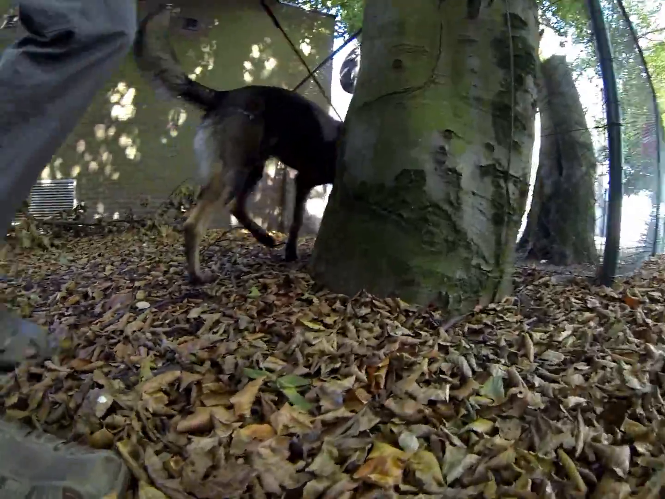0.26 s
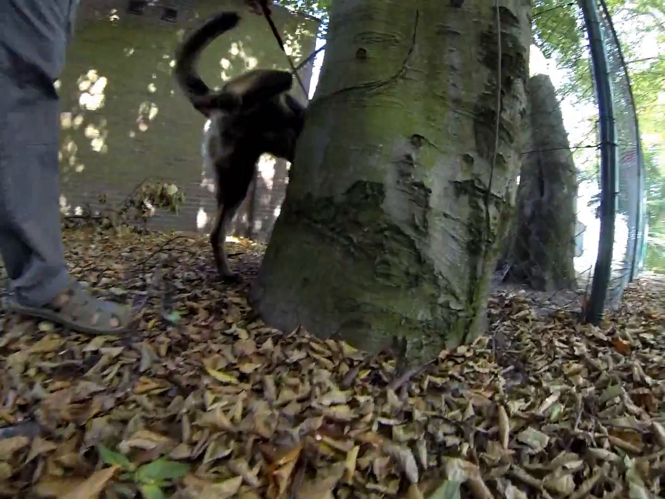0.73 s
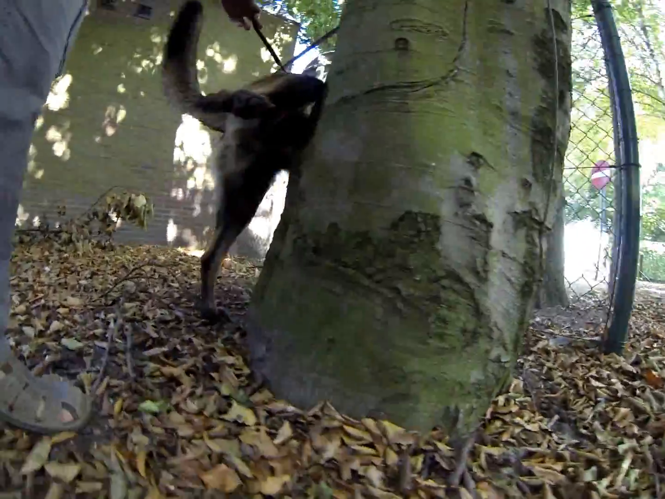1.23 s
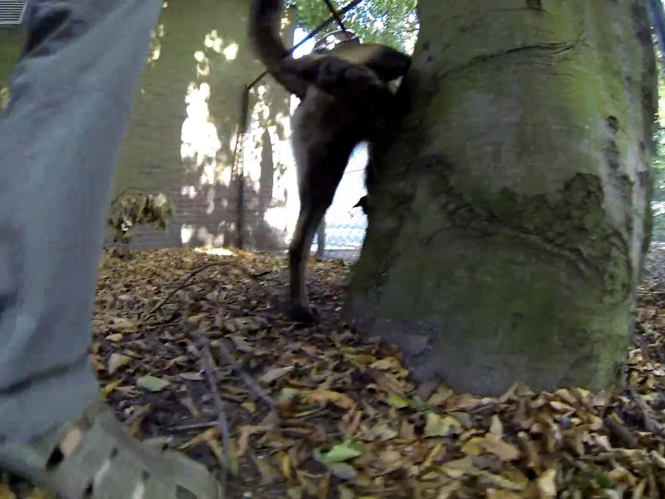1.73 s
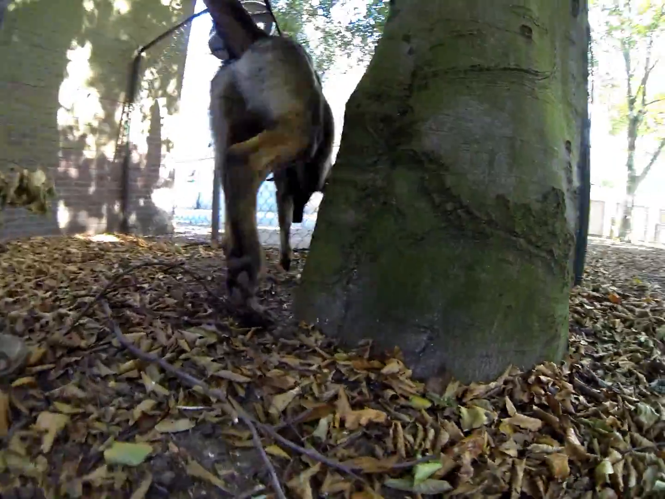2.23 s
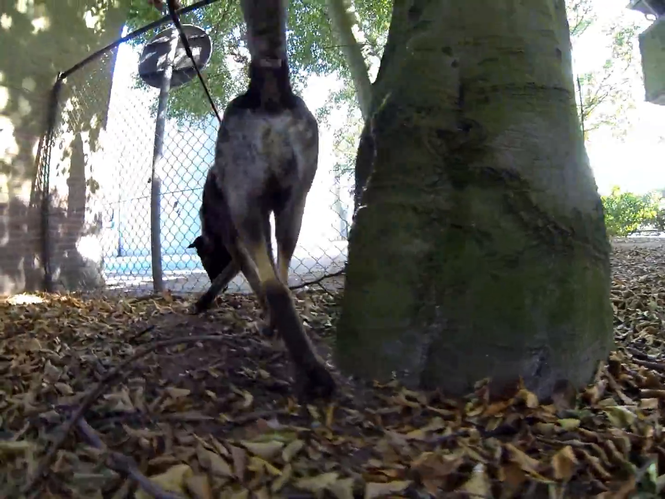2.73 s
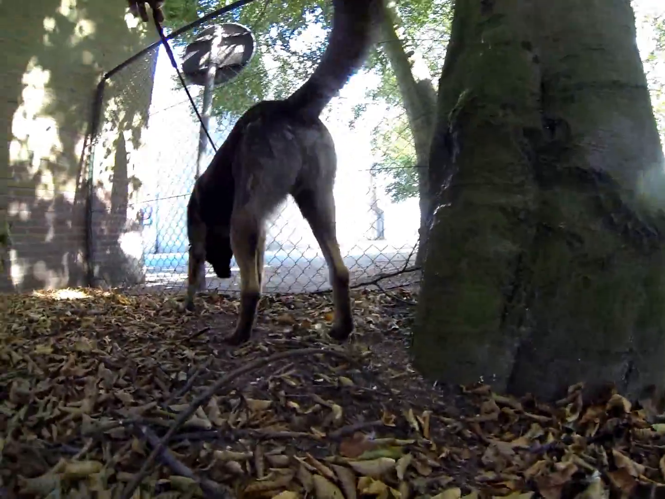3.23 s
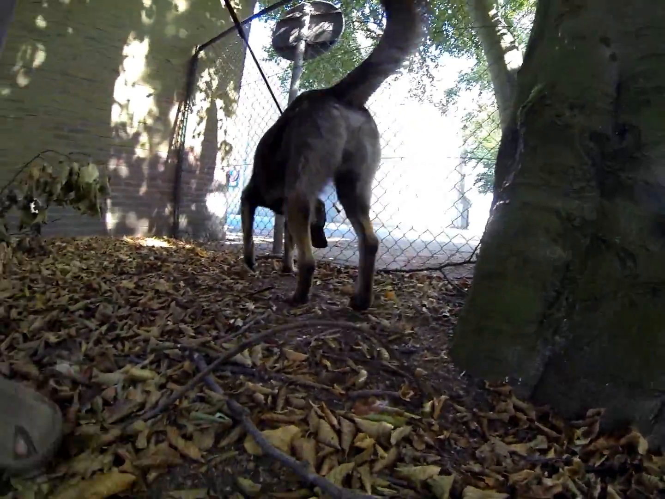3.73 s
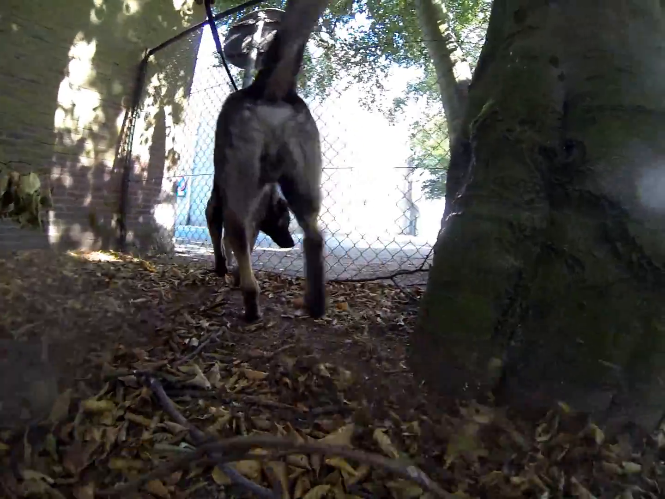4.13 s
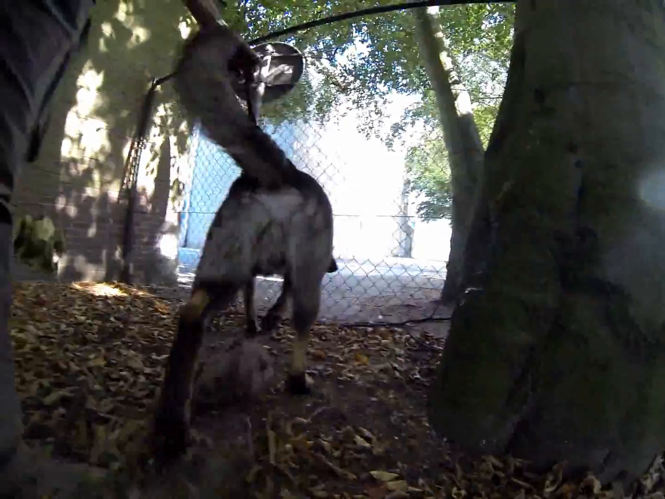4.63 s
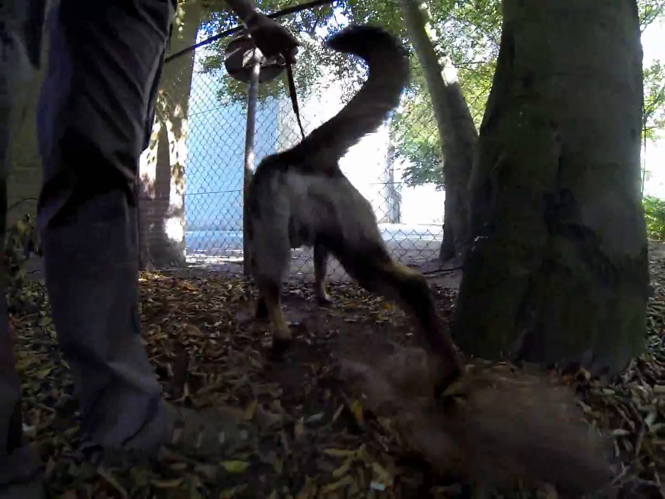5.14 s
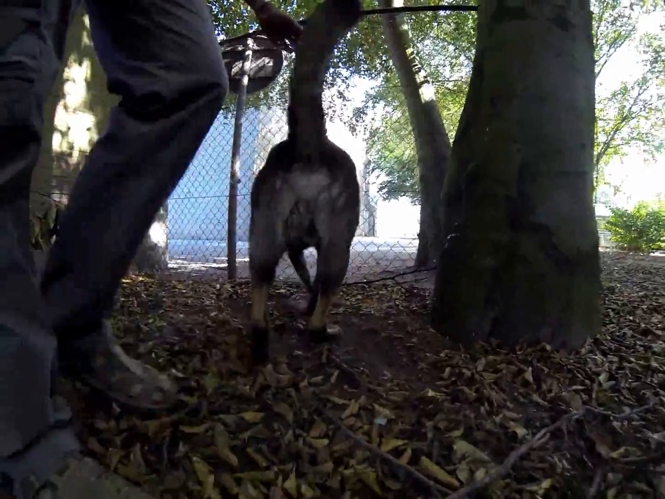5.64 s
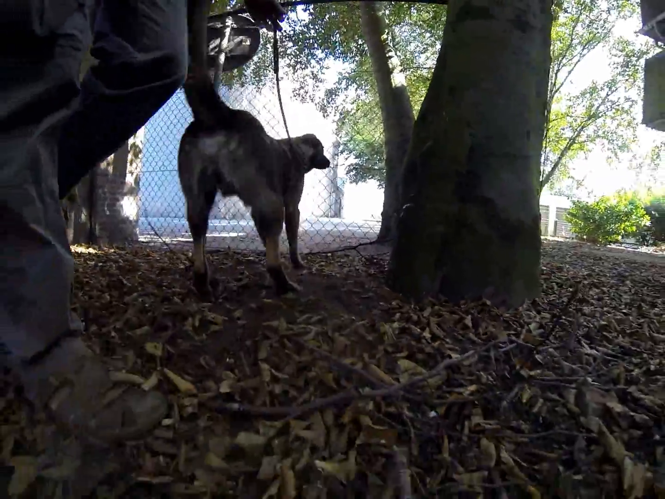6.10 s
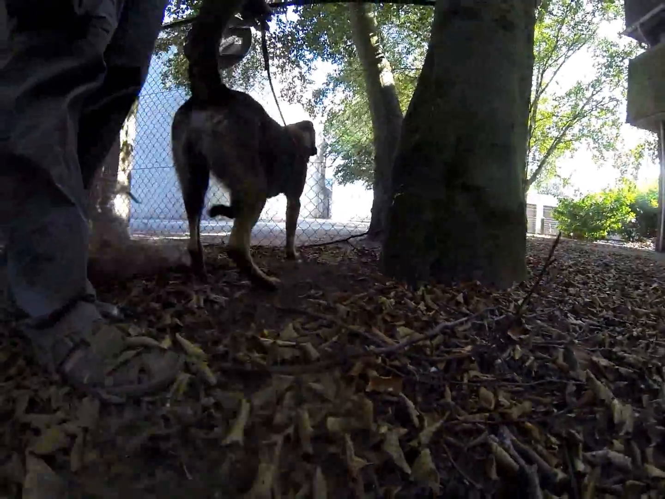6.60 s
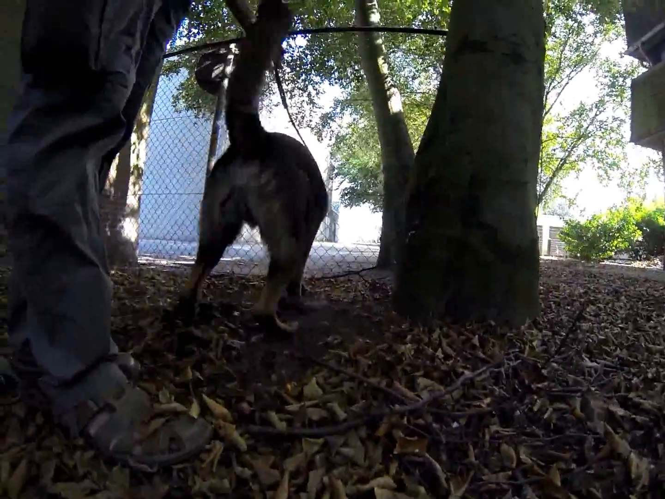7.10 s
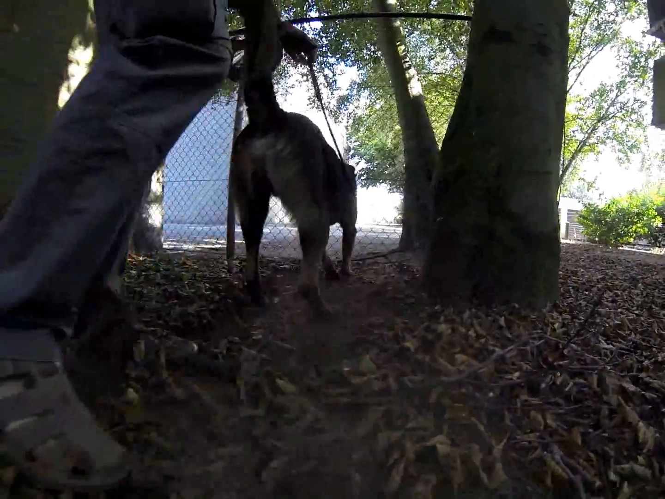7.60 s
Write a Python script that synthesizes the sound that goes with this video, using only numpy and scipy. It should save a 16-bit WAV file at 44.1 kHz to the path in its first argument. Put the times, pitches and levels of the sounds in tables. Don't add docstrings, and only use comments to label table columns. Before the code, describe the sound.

A dog shuffles and kicks through crisp fallen leaves, close and boxy, over handling rumble, ending with two bursts of sharp, loud knocks.

```python
import sys
import numpy as np
from scipy import signal
from scipy.fft import rfft, irfft
from scipy.io import wavfile
from scipy.ndimage import uniform_filter1d, map_coordinates

SR = 44100
rng = np.random.default_rng(int(sys.argv[2]) if len(sys.argv) > 2 else 0)


def natural_amplitude(level_db):
    exponent = np.asarray(level_db, float) / 20
    return 10 ** exponent


def store_wav(level_fs):
    pcm = np.round(np.clip(np.atleast_2d(level_fs), -1, 1) * 32767)
    wavfile.write(sys.argv[1], SR, pcm.T.astype(np.int16))


N = 346621

# time in seconds, gain in dB.
DUCK = [
    (0, 7),
    (6.41, 11),
    (6.5, -5),
    (6.85, -2.5),
    (7.15, 3.5),
    (7.39, 16),
    (7.46, 13),
    (7.86, 12),
]
SCRAPE_RISE, SCRAPE_FALL = 470, 188
CRUNCH_LIFE = 0.46
FIZZ_LIFE = 0.62


def unit(x):
    return x / np.sqrt(np.mean(x ** 2) + 1e-20)


def along(points, hz):
    f, v = np.transpose(points)
    return np.interp(np.log(hz + 1), np.log(f + 1), v)


def curves(rows):
    s, *cols = np.transpose(np.vstack(rows))
    return [np.interp(np.arange(N) / SR, s, c) for c in cols]


def wobble(rate):
    knots = rng.standard_normal(int(N * 400 / SR) + 4)
    return map_coordinates(knots, [np.arange(N) * min(rate, 400) / SR])


def coloured(x, gain_db):
    m = 2 ** 15
    cep = irfft(gain_db(np.fft.rfftfreq(m, 1 / SR)) * np.log(10) / 20, m)
    cep[1:m // 2] *= 2
    cep[m // 2 + 1:] = 0
    response = irfft(np.exp(rfft(cep)), m)
    return signal.fftconvolve(x, response)[:N]


def resonance_db(f, hz, width):
    return -10 * np.log10(1 + ((f * f - hz * hz) / (f * width + 1e-9)) ** 2)


def split(f, low_hz, high_hz):
    return -10 * np.log10((1 + (low_hz / (f + 1)) ** 8) * (1 + (f / high_hz) ** 8))


def steady(x, span_s):
    power = np.abs(uniform_filter1d(x ** 2, size=round(span_s * SR)))
    return unit(x / (power + 0.23 * np.mean(power)) ** 0.21)


def swells(rows, rise, fall):
    s, hold, db, extra_db = np.transpose(rows)[:, :, None]
    t = np.arange(0, N / SR + .002, .002)
    before, after = np.maximum(s - t, 0), np.maximum(t - s - hold, 0)
    power = natural_amplitude(2 * (db - rise * before - fall * after))
    weighted = power * natural_amplitude(2 * extra_db)
    return np.array([np.interp(np.arange(N) / SR, t, p.sum(axis=0)) for p in (power, weighted)])


def bumps_db(f):
    # frequency in Hz, width in Hz, height in dB.
    modes = [(1381, 280, 16), (1586, 314, 17), (2128, 120, 11.5), (2373, 66, 8.5), (2705, 65, 5),
             (2990, 34, 6), (3495, 390, 7.5), (3910, 166, 11), (5830, 280, -1), (4840, 1010, 9.5),
             (5336, 120, 7.5), (6614, 1030, 9.5), (7980, 500, 5.5), (9340, 470, -5.5), (10540, 750, 3.5)]
    return sum(db / (1 + (2 * (f - hz) / w) ** 2) for hz, w, db in modes)


def ranges(crunch, body, fizz, cavity, top_db):
    # frequency in Hz, level in dB.
    wall = [(150, -32.5), (500, -3.5), (1000, -26), (1900, -17), (3000, -6.5), (6000, -26.5), (9200, -31),
            (13000, -38), (15000, -45), (15600, -55), (15780, -92), (16500, -82.5)]

    def gain_db(f):
        treble = 0.64 * (f > 15700) + 0.11 * np.clip(f / 6000 - 1, 0, 1)
        return along(wall, f) + cavity * bumps_db(f) + top_db * treble

    low = coloured(crunch, lambda f: gain_db(f) + split(f, low_hz=1056, high_hz=1927))
    mid = coloured(body, lambda f: gain_db(f) + split(f, low_hz=1894, high_hz=5830))
    high = coloured(fizz, lambda f: gain_db(f) + split(f, low_hz=6260, high_hz=19200))
    return low, mid, high


def bursts(rows, lives=(1,), crack=3.04):
    t = np.arange(2000) / SR
    push = np.zeros((len(rows[0]) - 2, N + SR))
    for s, *db, t60 in rows:
        decay = natural_amplitude(-60 * t / (max(t60, .002) * np.c_[[*lives]]))
        burst = np.sign(rng.standard_normal(len(t))) * decay
        burst[:, 0] = crack
        push[:, round(s * SR):][:, :len(t)] += natural_amplitude(db)[:, None] * burst
    return push


def hits(rows, gains_db, cavity, top_db, crunch_life):
    pushes = bursts(rows, lives=(1, crunch_life, FIZZ_LIFE))
    body, crunch, fizz = natural_amplitude(gains_db)[:, None] * pushes
    return sum(ranges(crunch, body, fizz, cavity=cavity, top_db=top_db))


def pings(rows, attack_s):
    out, t = np.zeros(N + SR), np.arange(9000) / SR
    for s, db, hz, t60 in rows:
        envelope = natural_amplitude(db - 60 * t / max(t60, .004)) * (1 - np.exp(-t / attack_s))
        out[round(s * SR):][:len(t)] += envelope * np.sin(2 * np.pi * hz * t)
    return out[:N]


def crackle(spread_db, hiss_level, patchy_db, count):
    folds = (rng.random(N) < 110 / SR) * np.minimum(rng.exponential(size=N), 2.5)
    crumple = 3.4 + signal.lfilter([1], [1, -np.exp(-1 / (.008 * SR))], folds)
    where, pitch, life = rng.random(count), rng.standard_normal(count), rng.random(count)
    size = np.minimum(rng.exponential(size=count), 3)
    first = np.searchsorted(np.cumsum(crumple ** 2), where * np.sum(crumple ** 2))
    index = first[:, None] + np.arange(200)
    hz = np.clip(5000 * np.exp(.7 * pitch), 800, 15000)[:, None]
    t = np.arange(200) / SR
    cycles_to_60db = 8 + 22 * life[:, None]
    envelope = natural_amplitude(spread_db * size[:, None] - 60 * t * hz / cycles_to_60db)
    breaks = envelope * np.sin(2 * np.pi * hz * t) * np.sqrt(hz)
    snapping = unit(np.bincount(index.ravel(), breaks.ravel(), N + 200)[:N])
    x = snapping + hiss_level * unit(crumple * rng.standard_normal(N))
    z = signal.stft(x, nperseg=512)[2]
    field = uniform_filter1d(rng.standard_normal(z.shape), size=8, axis=0)
    field = uniform_filter1d(field, size=14, axis=1)
    return signal.istft(z * natural_amplitude(patchy_db * unit(field)), nperseg=512)[1][:N]


def leaves():
    # start in seconds, hold in seconds, level in dB, weight in dB.
    steps = [(0, 0.076, -54, -2), (.14, 0.04, -55, -3), (.27, 0.21, -52.5, 0.5), (.52, 0.21, -62.5, -11),
             (.68, 0.22, -57, -2.5), (.95, 0.044, -55, 2.5), (1.02, 0.12, -43.5, -1.5),
             (1.2, 0.11, -56, -6), (1.53, 0.054, -58, 4.5), (1.69, 0.088, -50.5, 0), (1.81, 0.023, -46, -2),
             (1.92, 0.023, -52, 0), (2.0, 0.017, -57, 1), (2.12, 0.077, -54, 3.5), (2.5, 0.022, -74, 13),
             (2.62, .1, -63, 2), (2.77, 0.15, -59, 1), (3.05, 0.075, -54, -3), (3.2, 0.078, -51.5, 0),
             (3.33, 0.034, -42, -2), (3.42, 0.041, -49.5, 3), (3.585, 0.016, -51, 3.5),
             (3.68, 0.13, -50, 2), (3.86, .04, -51, -2), (3.96, 2.55, -53.5, 1.5)]
    # start in seconds, hold in seconds, level in dB,
    # weight in dB.
    scrapes = [(3.95, 0.04, -43, -6), (4.06, 0.2, -43, -3), (4.3, 0.12, -47, -1.5),
               (4.49, 0.089, -40.5, -4), (4.59, 0.014, -39, -2.5), (4.7, 0.21, -45, -3.5),
               (5.02, 0.011, -45, -19), (5.09, 0.023, -39.5, -1.5), (5.17, 0.11, -47.5, -6),
               (5.31, 0.09, -43.5, -5.5), (5.45, 0.16, -44, -2.5), (5.65, 0.024, -39, -6),
               (5.71, 0.017, -36.5, -5.5), (5.83, 0.0086, -36, -5), (5.91, 0.058, -38, -4),
               (5.99, 0.021, -33, -4), (6.075, 0.033, -37.5, -5.5), (6.16, 0.048, -46.5, -6),
               (6.28, 0.041, -43.5, -13), (6.92, 0.031, -74, 12), (7.1, 0.11, -54, -7),
               (7.07, .02, -63, -7), (7.22, 0.03, -52.5, -1), (7.3, 0.23, -46, -7),
               (7.44, 0.045, -36, -4.5), (7.5, 0.045, -41, -4.5), (7.57, 0.081, -43.5, -6.5),
               (7.66, 0.028, -54, -17), (7.73, 0.033, -46.5, 3), (7.81, 0.055, -50, -2)]
    # start in seconds, hold in seconds, level in dB, weight in dB.
    settling = [
        (6.52, 0.096, -52.5, -6),
    ]
    litter_db, litter_weight_db, litter_fizz_db = -70, 2.5, -8
    step_fizz_db, scrape_fizz_db = -5.5, -4.5

    duck_db, = curves([DUCK])
    litter = natural_amplitude(2 * (litter_db + duck_db))
    step, step_low = swells(steps, rise=490, fall=157)
    raking = swells(scrapes, SCRAPE_RISE, SCRAPE_FALL)
    rake, rake_low = raking + swells(settling, SCRAPE_RISE, fall=47)
    heavy = step_low + rake_low + litter * natural_amplitude(2 * litter_weight_db)
    dry_step, dry_rake = step * natural_amplitude(2 * step_fizz_db), rake * natural_amplitude(2 * scrape_fizz_db)
    dry_power = dry_step + dry_rake + litter * natural_amplitude(2 * litter_fizz_db)
    breaks = steady(crackle(spread_db=3.8, hiss_level=2.1, patchy_db=2.1, count=16000), span_s=.05)
    crunch, body, fizz = map(unit, ranges(breaks, breaks, breaks, cavity=0.93, top_db=-15.0))
    low = natural_amplitude(1.86) * np.sqrt(heavy) * crunch
    high = natural_amplitude(2.4) * np.sqrt(dry_power) * fizz
    return np.sqrt(step + rake + litter) * body + low + high


def jolts():
    # start in seconds, peak in dB, clamp ring in dB.
    thumps = [(0.838, -37, -34), (1.314, -41, -36), (1.628, -53, -27), (1.867, -22, -31),
              (2.598, -29.5, -44), (3.119, -43, -24), (4.263, -42.5, -30), (4.382, -36.5, -45),
              (5.202, -41, -37), (5.719, -49, -12), (7.73, -27.5, -47)]
    out, t = np.zeros(N + SR), np.arange(4000) / SR
    swell = 1 - np.exp(-t / 0.01)
    thud = np.sin(2 * np.pi * 188 * t) * natural_amplitude(-60 * t / 0.063)
    thud += 0.15 * np.sin(2 * np.pi * 140 * t) * natural_amplitude(-60 * t / 0.17)
    for s, db, ring_db in thumps:
        clamp = natural_amplitude(ring_db - 60 * t / 0.15) * np.sin(2 * np.pi * 684 * t)
        out[round(s * SR):][:len(t)] -= natural_amplitude(db + 10) * swell * (thud + clamp)
    return out[:N]


def pole():
    # time in seconds, level in dB.
    grip = [(0.0, -37), (0.65, -45.5), (1.31, -33.5), (1.42, -41.5), (1.99, -34.5), (2.3, -50), (2.36, -40),
            (2.41, -48.5), (2.63, -38), (2.87, -46), (4.16, -46), (4.33, -35.5), (6.35, -43), (6.41, -55.5),
            (7.38, -43), (7.42, -43), (7.53, -45), (7.86, -47)]
    # start in seconds, hold in seconds, level in dB, looseness in dB.
    twitches = [(0, 0.024, -48, -5.5), (.3, 0.2, -50.5, -21), (.66, 0.064, -61, 2.5),
                (.83, 0.084, -42, -16), (.98, 0.02, -48.5, -1), (1.15, .03, -50.5, -1.5),
                (1.32, 0.024, -50, -2), (1.5, 0.082, -51, -18), (1.64, 0.062, -40.5, -8),
                (1.75, 0.22, -51, 7.5), (1.97, 0.073, -44.5, -7), (2.12, 0.22, -48, -5.5),
                (2.5, 0.14, -46.5, -5), (2.83, 0.059, -43, -8), (3.02, 0.22, -44, -7),
                (3.38, 0.049, -50, -9), (3.7, 0.3, -56.5, -8), (4.1, .05, -64, -4),
                (4.25, 0.022, -47, -2.5), (4.38, 0.2, -45, -2.5), (4.85, 0.16, -46.5, -19),
                (5.1, 0.26, -54.5, -3), (5.7, 0.036, -57, 10), (5.85, 0.28, -55, -21),
                (6.22, 0.093, -45, -6.5), (6.72, 0.32, -52.5, -14.5), (7.2, 0.065, -43.5, -7.5),
                (7.4, 0.093, -49, -7), (7.58, 0.038, -45, -5), (7.71, 0.035, -40, -3)]
    # frequency in Hz, width in Hz, level in dB.
    upper_modes = [(140, 20.6, 0.5), (188.7, 25, -1.5), (278, 16, -10)]
    rest_db, rest_loose_db = -70, -1.5

    def upper_db(f):
        return 10 * np.log10(sum(natural_amplitude(2 * (db + resonance_db(f, hz, w))) for hz, w, db in upper_modes) + 1e-9)

    (sway_db,), (duck_db,) = curves([grip]), curves([DUCK])
    rest = natural_amplitude(2 * (rest_db + duck_db + [[0], [rest_loose_db]]))
    flex, loose = np.sqrt(swells(twitches, rise=320, fall=130) + rest)
    push = rng.standard_normal((3, N))
    sway = steady(coloured(push[0], lambda f: 1.55 * resonance_db(f, hz=28.86, width=5.5)), span_s=1.0)
    bend = steady(coloured(push[1], lambda f: 1.46 * resonance_db(f, hz=72.84, width=8.2)), span_s=0.19)
    rattle = unit(coloured(push[2] * natural_amplitude(1.3 * wobble(23)), lambda f: 1.53 * upper_db(f)))
    return natural_amplitude(sway_db - 1.0) * sway + flex * bend + natural_amplitude(-1.5) * loose * rattle + jolts()


def air():
    # frequency in Hz, level in dB per Hz.
    spectrum = [(59, -29.5), (100, -9.5), (364, -19.5), (687, -21.5), (925, -24.5), (1570, -12.5),
                (1940, -31), (2110, -20.5), (2610, -27), (3740, -33), (6630, -40), (13600, -50.5),
                (15800, -67.5)]
    duck_db, = curves([DUCK])
    noise = unit(coloured(rng.standard_normal(N), lambda f: along(spectrum, f)))
    return natural_amplitude(-66.5 + duck_db + 2.0 * wobble(4.4)) * noise


def hiss():
    noise = rng.standard_normal(N)
    top = coloured(noise, lambda f: split(f, low_hz=7500, high_hz=13500) - 60 * (f > 15200))
    return natural_amplitude(-82 - 4) * unit(top)


def ticks():
    # start in seconds, peak in dB, crunch in dB, fizz in dB.
    cracks = [(0.0084, -31, -38.5, -44), (0.0367, -34, -34, -52), (0.0654, -45, -55, -62),
              (0.0924, -47, -56, -58), (0.1004, -49, -47, -60), (0.1176, -45, -51, -47),
              (0.2454, -42, -53, -60), (0.2914, -47, -45, -63), (0.3104, -48, -52, -56),
              (0.336, -44, -46, -50), (0.6434, -43, -47, -56), (0.75, -45, -42, -65),
              (0.8402, -47, -47, -54), (0.9035, -36, -50, -44), (1.038, -39, -41, -52),
              (1.0544, -34, -45, -51), (1.0754, -31, -43, -51), (1.0934, -27, -37, -44),
              (1.1024, -35, -36, -47), (1.1248, -25.5, -44, -45), (1.1434, -32, -40, -49),
              (1.1524, -22, -41, -50), (1.215, -24, -44, -54), (1.2314, -39, -44, -54),
              (1.2695, -46, -49, -56), (1.4864, -47, -57, -60), (1.5324, -46, -43, -61),
              (1.6094, -50, -42, -65), (2.211, -45, -45, -59), (2.3114, -52, -41, -65),
              (2.3824, -51, -52, -70), (2.4704, -48, -44, -55), (2.502, -43, -45, -67),
              (2.5374, -53, -57, -67), (2.5934, -48, -49.5, -65), (2.827, -48, -44, -58),
              (3.2854, -42, -45, -51), (3.69, -44, -47, -42), (4.0546, -28, -47, -48),
              (4.1576, -17.5, -37, -34), (4.2984, -36, -45, -38), (4.3824, -25.5, -44, -51),
              (5.006, -38, -56, -46), (5.014, -31, -49, -40), (5.089, -29, -40, -48),
              (5.1714, -33, -39, -51), (5.2584, -22, -43, -50), (5.3216, -34, -44.5, -47),
              (6.2706, -33, -45, -50)]
    rows = [(*row, .011) for row in cracks]
    return hits(rows, gains_db=[2, 19, 28], cavity=1.0, top_db=-22.0, crunch_life=CRUNCH_LIFE)


def snaps():
    # start in seconds, peak in dB, crunch in dB, fizz in dB.
    breaking = [(0.0258, -34, -42, -49), (0.0472, -26, -31, -29.5), (0.078, -33, -33, -46),
                (0.1511, -36, -48, -48), (0.168, -30, -31, -39), (0.1872, -17.5, -30, -34),
                (0.666, -35, -33, -52), (0.945, -42, -41, -57), (1.022, -29, -29, -50),
                (1.585, -42, -40.5, -45), (1.6953, -50, -38, -38), (2.0111, -29.5, -35.5, -43),
                (2.1226, -36, -39, -52), (2.946, -54, -49, -51), (2.988, -50, -47, -41),
                (3.102, -51, -61, -43), (3.1931, -32.5, -63, -56), (3.338, -28, -32, -32),
                (3.4242, -28, -29.5, -44), (3.5862, -29, -28.5, -36.5), (3.657, -38, -37, -49),
                (3.9297, -26, -29.5, -57), (4.004, -24, -36, -28), (4.114, -26, -38, -51),
                (5.1036, -43, -28, -47), (5.8255, -25, -34, -37), (5.9943, -42, -29, -39),
                (6.0754, -17, -32, -41), (6.093, -23, -32.5, -42), (6.2983, -16.5, -34, -48),
                (3.332, -32, -33, -36), (3.344, -30, -30, -34), (3.366, -30, -40, -42),
                (3.387, -32, -40, -44), (3.399, -39, -34, -50), (3.435, -38, -35, -48),
                (3.447, -38, -44, -47), (3.461, -44, -46, -54), (3.476, -42, -36, -54),
                (3.524, -40, -36, -58), (3.543, -40, -43, -50), (0.372, -44, -46, -56),
                (0.385, -44, -42, -56), (0.428, -44, -42, -52), (0.44, -41, -43, -54),
                (0.459, -44, -40.5, -54)]
    # start in seconds, peak in dB, crunch in dB, fizz in dB.
    landing = [(6.4624, -42, -41, -38), (6.4796, -23.5, -33, -35), (6.5104, -46, -56, -50),
               (6.5504, -61, -53, -55), (6.853, -72, -53, -70), (6.878, -56, -64.5, -67.5),
               (6.9194, -58, -55, -73), (6.9383, -57, -52, -68), (7.005, -50.5, -56.5, -53.5),
               (7.234, -44, -37.5, -60), (7.456, -28, -31, -48.5), (7.4692, -28, -26, -34),
               (7.637, -11, -19.5, -23.5), (7.641, -22, -30, -49), (7.738, -34, -40, -50)]
    rows = [(*row, .014) for row in breaking + landing]
    return hits(rows, gains_db=[4, 19, 25], cavity=1.0, top_db=-22.0, crunch_life=CRUNCH_LIFE)


def hums():
    # start in seconds, peak in dB, pitch in Hz, 60 dB decay in seconds.
    knocked = [
        (4.245, -36, 85, .15),
        (4.372, -34.5, 140, 0.18),
        (4.375, -41, 275, .09),
        (4.49, -43, 139, .3),
        (2.59, -32, 133, 0.17),
        (2.74, -41, 140, .12),
    ]
    return pings(knocked, attack_s=.009)


def collar():
    # start in seconds, peak in dB, pitch in Hz, 60 dB decay in seconds.
    links = [(2.8604, -49, 6840, 0.014), (2.8844, -56, 6700, 0.014), (2.8964, -54, 8050, 0.014),
             (2.9114, -55, 6560, 0.014), (2.9457, -49, 8030, 0.014), (2.9637, -49, 8000, 0.012),
             (2.9881, -41, 6390, 0.014), (3.0086, -51, 7840, 0.014), (3.0294, -55, 8020, 0.014),
             (3.0604, -56, 6400, 0.014), (3.0834, -51, 6280, 0.014), (3.1004, -46, 7930, 0.014),
             (3.1064, -43, 7980, 0.014), (3.1184, -44, 8150, 0.014), (3.1534, -57, 6300, 0.014),
             (6.8763, -53, 6240, 0.016)]
    return pings(links, attack_s=0.0011)


def strap():
    # start in seconds, peak in dB, pitch in Hz, 60 dB decay in seconds.
    slips = [
        (6.915, -49, 1570, .06),
        (6.93, -53.5, 1070, 0.06),
        (6.933, -50, 1480, .06),
        (6.947, -46, 1534, 0.093),
        (6.978, -61, 695, .06),
        (2.9875, -34, 10450, .009),
        (2.9875, -47, 14400, .008),
    ]
    return pings(slips, attack_s=0.0027)


def claws():
    # start in seconds, hold in seconds, level in dB, spare level in dB.
    drags = [
        (4.5, 0.14, -47, 1),
        (4.8, 0.046, -51, 0),
        (5.655, 0.03, -40.5, 0),
        (5.71, 0.03, -42, 0),
        (6.07, .012, -47.5, 0),
        (6.275, 0.065, -45.5, -2),
        (7.09, 0.065, -53.5, 0),
    ]
    rough = rng.standard_normal(N) * natural_amplitude(3.1 * wobble(120))
    rasp = coloured(rough, lambda f: 1.6 * resonance_db(f, hz=3670, width=710))
    return np.sqrt(swells(drags, SCRAPE_RISE, SCRAPE_FALL)[0]) * unit(rasp)


def grit():
    # start in seconds, peak in dB, crunch in dB, fizz in dB, 60 dB decay in seconds.
    strikes = [(6.4054, 5, 0, -15, 0.012), (6.4063, 11.5, 9, -7, 0.012), (6.4128, 6, 3.5, -8.5, 0.021),
               (6.4158, 6.5, 10, -11, 0.017), (6.4296, -8.5, -7.5, -14.5, 0.037),
               (6.4390, -35.5, -42, -56, 0.085), (7.3884, -3, -7, -10, 0.01), (7.3915, 2.5, 1, -9, 0.038),
               (7.3928, -4, -0.5, -11, 0.025), (7.3965, -21, -24, -25, 0.017),
               (7.4035, -1, -10, -22, 0.068), (7.4073, -10, 1.5, -19, 0.033), (7.4115, -5, -27, -21, 0.02),
               (7.4156, -20, -21, -14, 0.0076), (7.4208, -5, -10, -17, 0.031),
               (7.4250, -22, -12, -27, 0.021), (7.4300, -17, -16, -23, 0.15), (7.4366, -5, -5, -17, 0.012),
               (7.4055, -12, -14, -18, 0.012), (7.4275, -18, -22, -18, 0.013),
               (7.432, -21, -29, -20, 0.012), (7.447, -26, -23, -26, 0.012), (7.4655, -23, -26, -30, 0.012)]
    # frequency in Hz, width in Hz, level in dB.
    node = (2130, 300, -6)
    hz, width, db = node
    x = hits(strikes, gains_db=[4, 15, 23], cavity=0.46, top_db=20.0, crunch_life=1)
    return coloured(x, lambda f: db / (1 + (2 * (f - hz) / width) ** 2))


def knocks():
    # start in seconds, peak in dB, four times the push's 60 dB decay in seconds.
    blows = [
        (6.4059, -12, 0.043),
        (6.4135, -19, 0.071),
        (6.4162, -3.5, 0.023),
        (6.430, -27, 0.028),
        (7.3918, -22, 0.023),
        (7.4082, -16.5, 0.057),
    ]
    # frequency in Hz, level in dB.
    shell = [(40, -28), (120, -0.5), (300, 0), (520, -8.5), (684, 5.5), (860, -11), (1100, 0), (1500, -31),
             (3000, -51.5)]
    push = bursts([(s, db, t60 / 4) for s, db, t60 in blows], crack=11)[0]
    return coloured(push, lambda f: along(shell, f) + 6)


def ring():
    # frequency in Hz, level in dB, swell time in seconds.
    modes = [(72.8, -27.5, 0.032), (145, -37, 0.022)]
    t = np.maximum(np.arange(N) / SR - 6.415, 0)
    out = np.zeros(N)
    for hz, db, swell in modes:
        envelope = (t / swell) ** 2 * np.exp(-t / swell)
        out += natural_amplitude(db) * envelope * np.sin(2 * np.pi * hz * t)
    return out


def scene():
    background = leaves() + pole() + air() + hiss()
    breaks = ticks() + snaps()
    small_modes = hums() + collar() + strap() + claws()
    strikes = grit() + knocks() + ring()
    return (background + breaks + small_modes + strikes)[None]


def band_limit(x):
    return signal.sosfilt(signal.butter(12, 16560, fs=SR, output="sos"), x)


def record(dry):
    mix = dry / (1 + np.abs(dry) ** 8) ** (1 / 8)
    return band_limit(mix)


dry = scene()
out = record(dry)
store_wav(out)
```